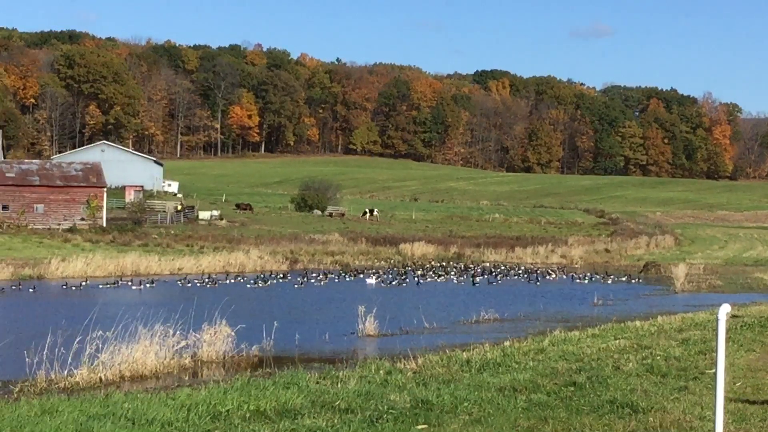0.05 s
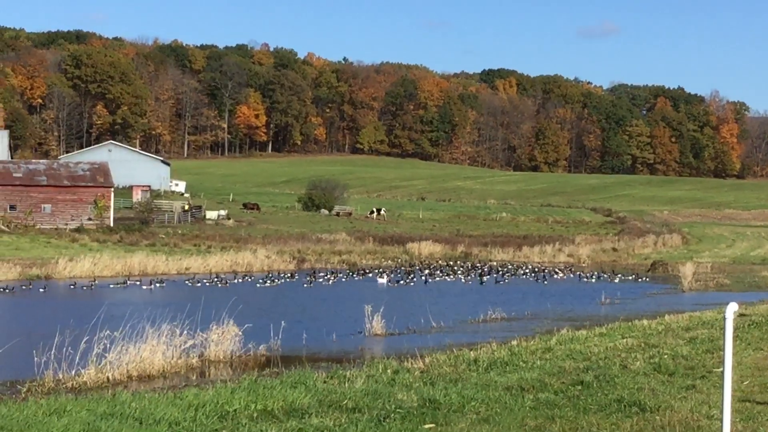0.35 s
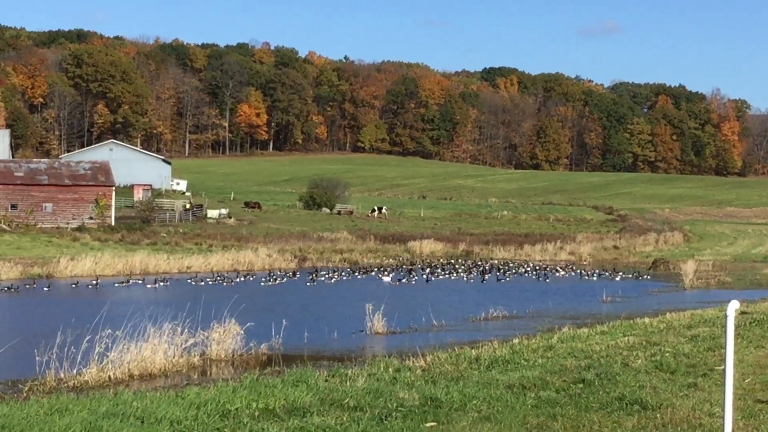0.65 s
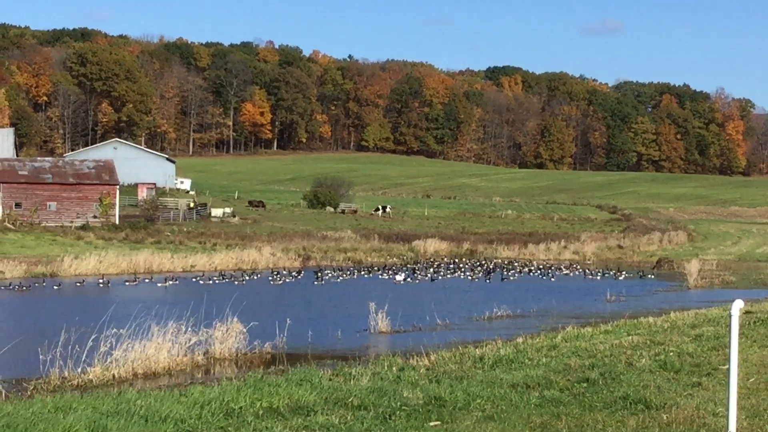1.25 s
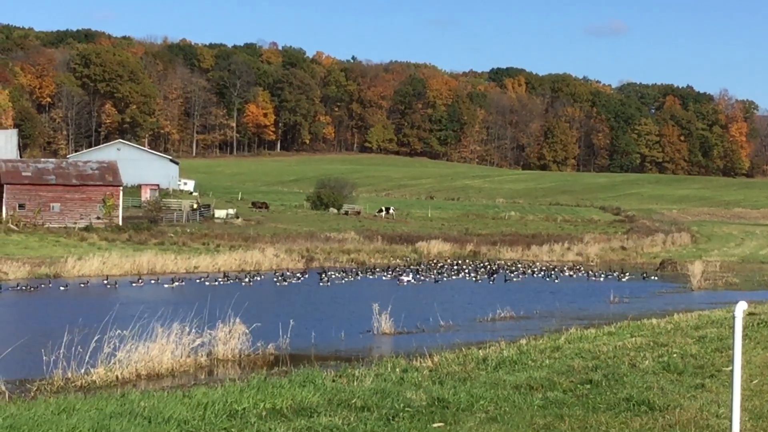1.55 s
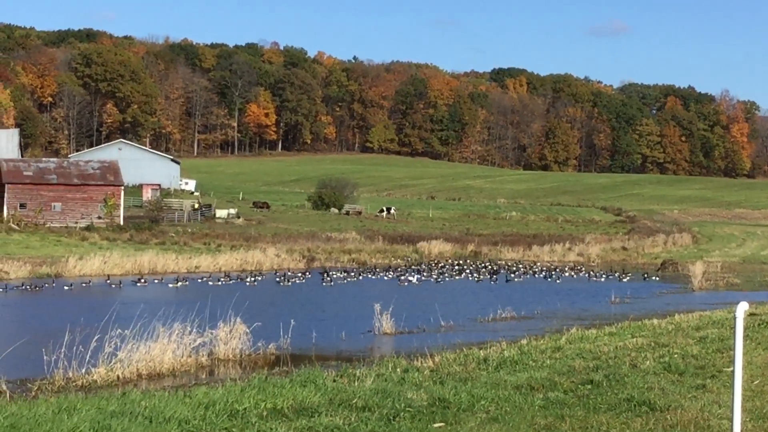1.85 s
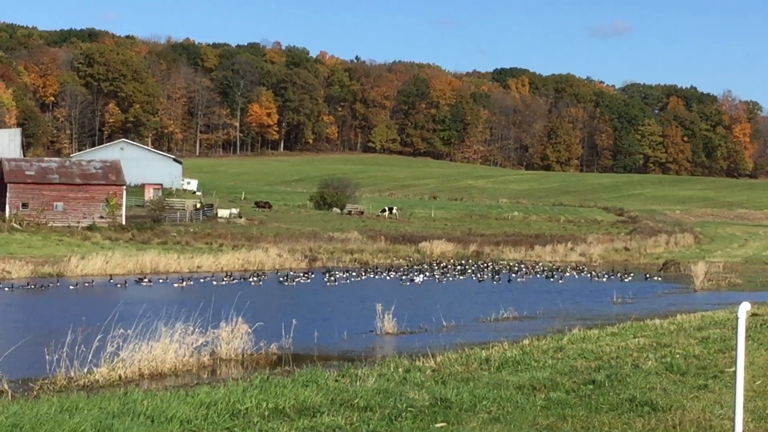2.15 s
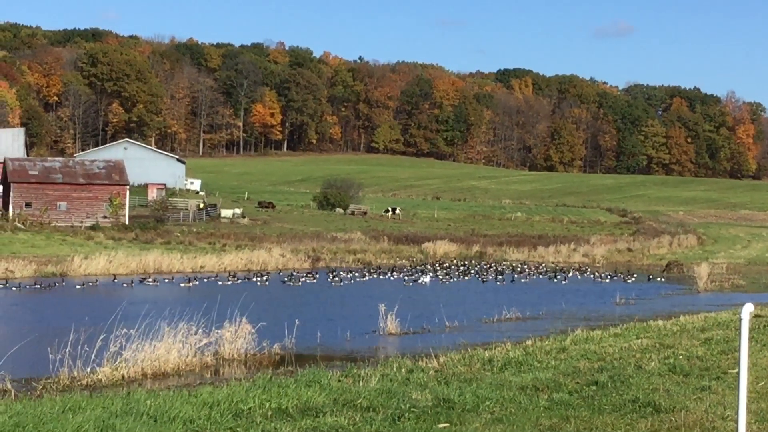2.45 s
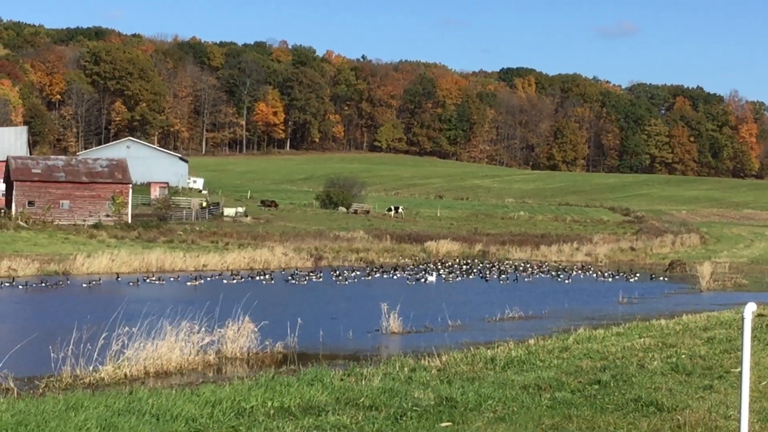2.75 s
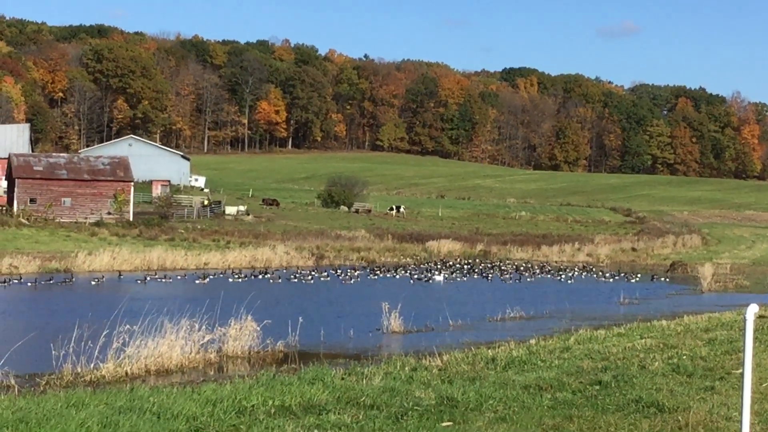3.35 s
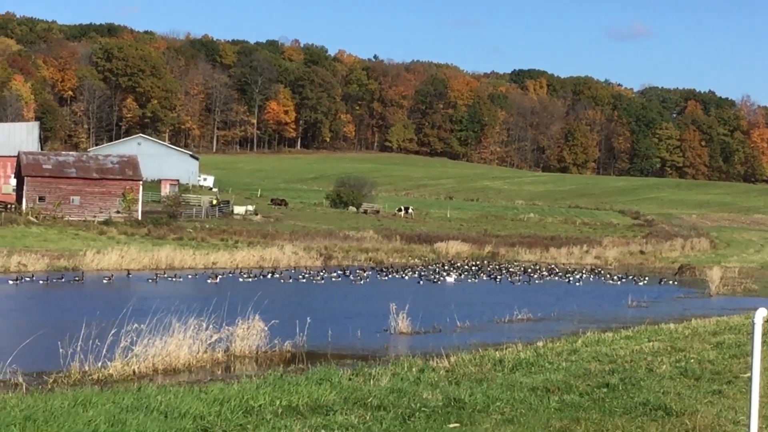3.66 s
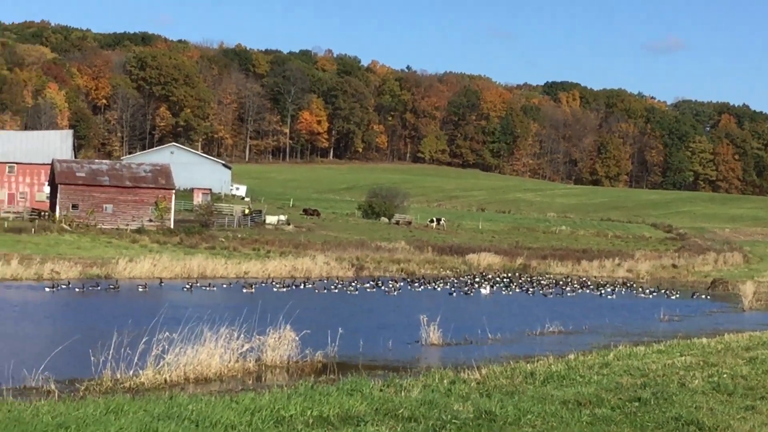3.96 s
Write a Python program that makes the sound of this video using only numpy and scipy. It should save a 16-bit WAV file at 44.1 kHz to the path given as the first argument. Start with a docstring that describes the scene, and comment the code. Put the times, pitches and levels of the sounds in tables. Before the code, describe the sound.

A flock of geese calls across a farm pond, creaky grunts and low hoots breaking into clear, overlapping honks with a slight echo. Farther geese murmur behind them, over low wind rumble, faint hiss and a distant engine.

```python
"""From the start, a distant engine drones under low wind rumble and faint hiss, and far geese murmur.
Then nearer geese call from a farm pond across a field: each voice starts as a creaky grunt or a low
hoot and breaks into a clear, arched honk, ringing in the throat and bill. The bank and woods echo it.
The engine speeds up a little until just past halfway, then slows while the geese keep calling."""
import sys
import numpy as np
from scipy import signal
from scipy.fft import rfft, irfft
from scipy.io import wavfile
from scipy.ndimage import map_coordinates

SR = 44100
rng = np.random.default_rng(int(sys.argv[2]) if len(sys.argv) > 2 else 0)


def waveform_to_disk(signal):
    """Save audio, clipped to [-1, 1], as 16-bit WAV at the path in sys.argv[1]."""
    frames = np.transpose(np.atleast_2d(signal))
    scaled = np.clip(frames, -1, 1) * 32767
    samples = np.round(scaled).astype(np.int16)
    wavfile.write(sys.argv[1], SR, samples)


N = 176400  # 4 seconds

# tone of the wind and hiss (frequency [Hz], gain [dB])
AIR_TONE = [(20, -25), (45, -3.5), (100, 3), (150, -0.5), (220, -5), (320, -8), (480, -22), (800, -24.5),
            (1300, -22.5), (2000, -36.5), (3000, -39), (5000, -48), (7500, -49), (9500, -43),
            (11500, -47.5), (15000, -65)]
# how fast the engine runs (time [s], speed [cycles/s])
ENGINE_SPEED = [(0.0, 26.0), (2.369, 27), (4.0, 25.5)]
# the engine's tones (multiple of its speed [number], level [dB])
ENGINE_TONES = [(2, -47.5), (3, -42.5), (4, -51.5), (5, -61), (6, -61), (7, -51.5), (8, -62.5), (9, -65.5),
                (12, -68.5)]
# how the throat and bill shape a note (frequency [Hz], gain [dB])
THROAT_TONE = [(300, -25), (560, -20.5), (820, -11.5), (1020, -5), (1220, 7), (1660, -2.5), (1850, 3),
               (2020, -13), (2480, -22), (2850, -8), (3250, -27), (4000, -22), (4700, -20), (6300, -31.5),
               (7000, -28), (7800, -39), (10200, -29), (11000, -26), (12500, -52), (15000, -66)]
# points where a voice sets its tone: chest, base, middle, nasal twice, treble twice, top (frequency [Hz])
BANDS_HZ = [850, 1100, 1850, 2200, 2700, 3800, 7100, 8500]
# creaky grunts (start [s], length [s], pulse rate [Hz], level [dB], treble [dB])
GRUNTS = [(0.077, 0.086, 238, -55, -15), (0.18, 0.12, 214.7, -59, -10), (0.299, 0.067, 239, -50, -13),
          (.375, 0.033, 293.6, -51, -16), (0.519, 0.027, 259, -47, -1.5), (0.674, 0.046, 219, -49.5, -5),
          (0.739, 0.034, 258, -49.5, -12), (0.871, 0.077, 215.8, -50, -12), (1.067, 0.042, 216.8, -53, -28),
          (1.186, 0.083, 220, -47, -15), (1.272, 0.084, 198.2, -51, -22),
          (1.375, 0.061, 284.5, -41.5, -2.5), (1.604, 0.11, 267.5, -59.5, -13),
          (1.799, 0.051, 270, -48.5, -10.5), (1.889, 0.032, 272.2, -47.5, -8),
          (2.094, 0.14, 277, -56.5, -9.5), (2.214, 0.024, 336, -43.5, -6), (2.235, 0.099, 316.2, -46.5, -8),
          (2.385, 0.038, 279, -50, -21), (2.562, .15, 262, -54.5, -30), (2.678, 0.063, 323.3, -46.5, -29),
          (2.83, 0.072, 221, -44.5, -13), (2.964, 0.076, 230.7, -58, -24),
          (3.173, 0.0407, 216.2, -51, -12.5), (3.355, 0.022, 266.4, -55, -37),
          (3.805, 0.023, 258, -49.5, -12), (3.863, 0.02, 285.6, -45, -6)]
# how the throat shapes a grunt (frequency [Hz], gain [dB])
GRUNT_TONE = [(200, -25), (600, -14), (900, -13.5), (1320, 5), (1650, -5), (2100, -17.5), (3100, -29),
              (4600, -16), (6500, -30), (8200, -33.5), (11000, -57), (15000, -60)]
# clear, high honks (start [s], length [s], pitch [Hz], opening rise [share of pitch],
# final fall [share of pitch], level before the throat [dB], chest [dB], nasal [dB], treble [dB],
# top [dB], bill resonance [Hz])
HONKS = [(.12, 0.087, 751, 0.079, 0.019, -45.5, 1.5, -5, -12, -6, 4350),
         (.235, 0.076, 750, 0.03, 0.11, -46.5, -24, 3, -22, -10, 4400),
         (.25, 0.0886, 848, 0, 0.047, -45.5, -2, 8, -10.5, 3.5, 4970),
         (.332, 0.054, 819, 0.017, 0.027, -36, -10, 2, -19, -21, 4800),
         (.4, 0.099, 807.5, 0.0035, 0.071, -49.5, 4.5, 14, -2.5, -4, 5100),
         (.533, 0.05, 779, 0.062, 0.02, -39, -3.5, -1, 4.5, 1.5, 3540),
         (.71, 0.076, 784, 0.0081, 0.11, -44, 3, 3, 8.5, 9.5, 5900),
         (.897, 0.11, 795, 0.014, 0.12, -42, 0.5, 3, -0.5, -15, 4250),
         (.937, 0.088, 738.4, 0.062, 0.059, -45.5, 3, -3, -6, -5, 4240),
         (1.105, 0.062, 771, 0.0018, .03, -41.5, -4, -6.5, -8.5, -9, 4040),
         (1.245, 0.049, 786, 0.095, 0, -45, 4, 0, -0.5, -10, 4100),
         (1.328, 0.082, 702, 0.034, 0.021, -42.5, 5, -11, -9.5, -16, 4350),
         (1.37, 0.031, 865, 0.04, 0.027, -41.5, 0, -8, 6, -10, 4800),
         (1.416, 0.075, 845.4, 0.0016, 0.24, -36, -0.5, -1, 2, -12, 4770),
         (1.478, 0.082, 790, 0.036, 0.12, -42, 3.5, -5, -8, -8, 4900),
         (1.48, 0.054, 932, 0.016, .01, -63.5, 37, -4, 2, -10, 4600),
         (1.84, 0.061, 866, 0.061, 0.11, -32, -13.5, 0, -0.5, -14, 5500),
         (1.905, 0.093, 787, 0, 0.09, -42, 1.5, -2, 2, -7, 4460),
         (2.298, 0.032, 733, 0.023, 0.31, -40, 2, -1, -1, -13, 5000),
         (2.435, 0.063, 734, 0.0094, 0.19, -57, 4, 7, -6, 11, 4440),
         (2.72, 0.086, 927, 0.0091, 0.12, -48, 11, 1, 5.5, -22, 5200),
         (2.873, 0.068, 785, 0.015, 0.057, -38, -0.5, -1, -3, 6, 5530),
         (2.902, 0.049, 847.5, 0.052, 0.022, -32.5, -10, 6.5, -9, -7, 4940),
         (2.895, 0.07, 763.6, 0.027, 0.12, -44, 0.5, 1, 5, -8, 4500),
         (3.203, 0.064, 776, 0, 0, -47.5, 4, 6.5, 15, 0, 5560),
         (3.443, 0.038, 699, 0.061, 0.27, -49.5, 10.5, -30, -22, -10, 4570),
         (3.59, 0.018, 666, 0, 0.52, -48, 2, -30, -25, -12, 4600),
         (3.872, 0.057, 843, 0, 0.21, -38.5, -0.5, 4, 3, -0.5, 5500)]
# hoarse rasps where a voice breaks (time [s], half width [s], level [dB], resonance [Hz])
RASPS = [(.23, 0.054, -58, 1920), (.34, .025, -54, 1820), (.542, 0.013, -57, 4660),
         (1.418, 0.013, -53, 4650), (1.844, 0.0045, -61, 4700), (2.31, .014, -55, 4700),
         (2.902, 0.011, -55.5, 4750), (3.217, .01, -64, 5100)]
# low hoots (start [s], length [s], pitch [Hz], opening rise [share of pitch],
# final fall [share of pitch], level before the throat [dB], chest [dB], nasal [dB], treble [dB])
HOOTS = [(0.355, 0.057, 608, 0.14, 0, -49.5, 4, 7, -17), (0.483, 0.062, 550.7, 0.074, 0, -48, 12, 2.5, -1),
         (.755, 0.073, 585.7, 0.067, 0.05, -50.5, 7, 4, -27),
         (1.213, 0.042, 651.6, 0, 0.052, -39, 0, -9, -12),
         (1.393, 0.037, 629.5, 0.027, 0.0077, -36.5, 3.5, -18, -3),
         (1.432, 0.05, 679, 0, 0.19, -37, -5, -27, -22),
         (2.229, 0.083, 646, 0.16, 0.079, -39, 6.5, -3, -6.5),
         (2.301, 0.071, 554, 0.085, 0.0056, -47, 12, -6, -13),
         (2.404, 0.092, 620, 0.032, 0.054, -47.5, -2, -2, -9),
         (3.028, 0.068, 689, 0.028, 0.063, -50.5, -3, -16, -30),
         (3.466, 0.143, 594, .085, 0.032, -41, 2.5, -15, -21),
         (3.821, 0.062, 616, 0.081, 0, -45, 7.5, 1.5, -1)]
# a goose pushes harder and its overtones flare (time [s], half width [s], boost [dB])
ACCENTS = [(1.472, 0.011, 14), (2.26, 0.0071, 13.5), (2.905, 0.012, 3.5), (3.55, .04, 10)]
# the dull tone of the echo (frequency [Hz], gain [dB])
ECHO_TONE = [(300, 0), (1800, 0), (3000, -10), (9000, -18)]

BILL_HZ = 4560  # bill resonance for the hoots
NEAR_DB = -43.5  # peak level of a near call


def undb(db):
    """Turn decibels into a gain to multiply by."""
    return 10 ** (np.asarray(db) / 20)


def colour(hz, points):
    """Read the gain of a (frequency [Hz], gain [dB]) curve at the given frequencies."""
    freqs, db = np.array(points, float).T
    return undb(np.interp(np.log(np.maximum(hz, 1)), np.log(freqs), db))


def noise(points):
    """Noise with the given tone curve and a spread of 1."""
    freqs = np.arange(N // 2 + 1) * SR / N
    x = irfft(rfft(rng.standard_normal(N)) * colour(freqs, points), N)
    return x / x.std()


def wander(rate_hz, size):
    """Smooth random drift with a spread near 1."""
    at = np.arange(size) * rate_hz / SR
    return map_coordinates(rng.standard_normal(4096), [at], order=3, mode="wrap")


def ramp(x):
    """Smooth step from 0 to 1."""
    return np.sin(np.pi / 2 * np.clip(x, 0, 1)) ** 2


def swell(t, when, width):
    """Bell-shaped rise and fall around a point."""
    return np.exp(-((t - when) / width) ** 2)


def add(out, start, x):
    """Mix a sound in at its start time."""
    i = max(int(start * SR), 0)
    out[i:i + len(x)] += x[:max(len(out) - i, 0)]


def wind(level_db=-47):
    """Soft wind rumble and hiss, gently uneven."""
    return noise(AIR_TONE) * undb(level_db + 0.43 * wander(2.24, N) + 1.04 * wander(11, N))


def engine():
    """The low tones of a distant engine, each wavering on its way across the field."""
    times, speeds = np.array(ENGINE_SPEED).T
    cycles = np.cumsum(np.interp(np.arange(N) / SR, times, speeds)) / SR
    out = np.zeros(N)
    for k, db in ENGINE_TONES:
        gain = np.sqrt(2) * undb(db + 0.5 * np.sqrt(k) * wander(5.5, N))
        phase = 2 * np.pi * (k * cycles + rng.random())
        out += gain * np.sin(phase + 0.026 * k * wander(5.5, N))
    return out


def goose_note(length, hz, rise, fall, jitter, band_db, bill_hz, start=0, harmonics=18):
    """One arched note, rough at the voice break, then clean; high overtones come last and leave first."""
    t = np.arange(int(length * SR)) / SR
    progress = t / length
    rise_end, fall_start = 0.626, 0.506  # shares of the length
    rising = rise * np.clip(1 - progress / rise_end, 0, 1) ** 2
    falling = fall * np.clip((progress - fall_start) / (1 - fall_start), 0, 1) ** 2
    pitch = hz * (1 - rising - falling)
    rough = (jitter + 0.03 * np.exp(-t / 0.008)) * wander(907, len(t))
    waver = 0.0034 * wander(80.6, len(t))
    phase = 2 * np.pi * np.cumsum(pitch * (1 + rough + waver)) / SR
    accent_db = sum(db * swell(start + t, when, width) for when, width, db in ACCENTS)
    # fade in, fade out and accent, for the low and the high harmonics
    body = ramp(t / 0.0042) * ramp((length - t) / 0.02) * undb(0.22 * accent_db)
    bright = ramp(t / 0.0093) * ramp((length - t) / 0.033) * undb(accent_db)
    out = 0
    for k in range(1, harmonics + 1):
        shimmer_db = 1.9 * np.sqrt(k / 2) * wander(54, len(t))
        db = np.interp(k * hz, BANDS_HZ, band_db) + shimmer_db
        loudness = body
        if k * hz > BANDS_HZ[4]:  # high overtones weaken away from the bill's resonance
            octaves_away = np.log2(k * pitch / bill_hz)
            db -= 9.5 * (1 - swell(octaves_away, 0, 0.4))
            loudness = bright
        out += colour(k * pitch, THROAT_TONE) * undb(db) * loudness * np.sin(k * phase)
    # strong and weak cycles take turns
    return out * (1 + 0.015 * wander(51, len(t)) * np.sin(phase / 2))


def far_flock(calls_per_s=26, middle_hz=672.3):
    """Many faint calls from the far side of the pond, their high overtones lost on the way."""
    out = np.zeros(N)
    total = int(calls_per_s * N / SR)
    band_db = np.interp(BANDS_HZ, BANDS_HZ[:4], [7, 6, -4.5, -6])
    for i, (late, long, high, faint) in enumerate(rng.random((total, 4))):
        hz = middle_hz * 2 ** (0.7 * (high - 0.5))
        call = goose_note(0.061 + 0.094 * long, hz, rise=0.0586, fall=0.052, jitter=0.012,
                          band_db=band_db, bill_hz=BILL_HZ, harmonics=3)
        add(out, (i + late) / calls_per_s, undb(-62.5 - 19.8 * faint) * call)
    return out


def grunts():
    """Slow pulses ring the throat; they quicken and grow uneven as the voice nears its break."""
    out = np.zeros(N)
    for start, length, hz, db, treble_db in GRUNTS:
        n = int(length * SR)
        t = np.arange(n) / SR
        progress = t / length
        pulse_hz = hz * (1 + 0.17 * (progress - 0.5) + 0.036 * progress * wander(350, n))
        cycles = np.cumsum(pulse_hz) / SR + 0.5
        pulses = np.diff(np.floor(cycles), prepend=0) * undb(1.9 * wander(312, n))
        breath = 0.016 * rng.standard_normal(n) * np.exp(-(cycles % 1) / 3.4)
        loudness = np.sqrt(ramp(progress / 0.72)) * ramp((length - t) / 0.014)
        freqs = np.fft.rfftfreq(2 * n, 1 / SR)
        gain = colour(freqs, GRUNT_TONE) * undb(treble_db * ramp((freqs - 2200) / 1500))
        # build a filter that rings after each pulse, never before it
        log_gain = np.log(np.r_[gain, gain[-2:0:-1]])
        throat = np.exp(np.conj(signal.hilbert(log_gain)))[:n + 1]
        grunt = irfft(rfft((pulses + breath) * loudness, 2 * n) * throat)
        add(out, start, undb(db) * grunt / np.sqrt(2 * np.mean(grunt ** 2)))
    return out


def goose_calls(table, jitter, middle_db):
    """Honks or hoots, each with its own tone: the direct sound, and the sound sent to the banks."""
    direct, to_banks = np.zeros((2, N))
    for start, length, hz, rise, fall, db, chest, nasal, treble, top, bill_hz in table:
        band_db = [chest, 0, middle_db, nasal, nasal, treble, treble, top]
        call = undb(db) * goose_note(length, hz, rise, fall, jitter, band_db, bill_hz, start)
        add(direct, start, call)
        # fainter calls are farther off, so more of their sound is echo
        add(to_banks, start, call * np.sqrt(undb(NEAR_DB) / np.abs(call).max()))
    return np.array([direct, to_banks])


def rasps(side_db=-31.5):
    """Rough, fluttering bursts in one resonance of the throat or bill."""
    t = np.arange(N) / SR
    out = np.zeros(N)
    for when, width, db, hz in RASPS:
        tone = [(hz / 2, side_db), (hz, 0), (hz * 2, side_db), (SR / 2, 2 * side_db)]
        out += undb(db) * swell(t, when, width) * noise(tone)
    return out * undb(2 * wander(300, N))


def echo(sound, level_db=-18, fade_s=0.38):
    """The bank and the woods send back a thin, dull tail."""
    t = np.arange(N) / SR
    tail = noise(ECHO_TONE) * undb(-60 * t / fade_s) * ramp(t / 0.015)
    tail /= np.sqrt(np.sum(tail ** 2))
    return undb(level_db) * signal.fftconvolve(sound, tail)[:N]


def scene():
    """Geese and their echo over the wind and the engine."""
    honks = goose_calls(HONKS, jitter=0.0023, middle_db=0)
    hoot_rows = [(*row, -15.5, BILL_HZ) for row in HOOTS]  # add (top [dB], bill resonance [Hz])
    hoots = goose_calls(hoot_rows, jitter=0.01, middle_db=-18)
    direct, to_banks = honks + hoots
    chatter = grunts() + rasps() + far_flock()
    return (direct + chatter + echo(to_banks + chatter) + engine() + wind())[None]


def record(dry, top_hz=15100):
    """A steep filter cuts off the highest treble."""
    return signal.sosfilt(signal.ellip(8, 0.2, 70, top_hz, fs=SR, output="sos"), dry)


dry = scene()
out = record(dry)
waveform_to_disk(out)
```